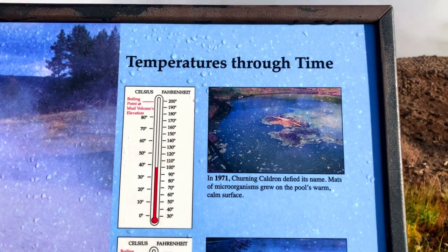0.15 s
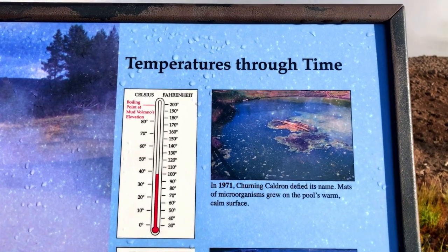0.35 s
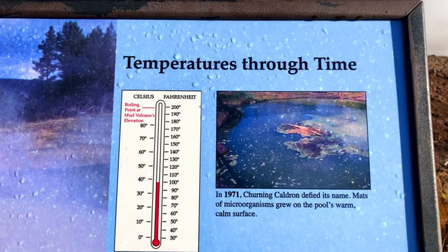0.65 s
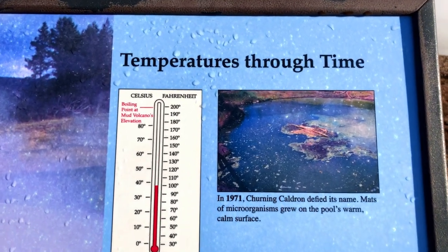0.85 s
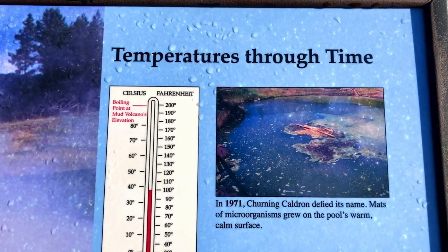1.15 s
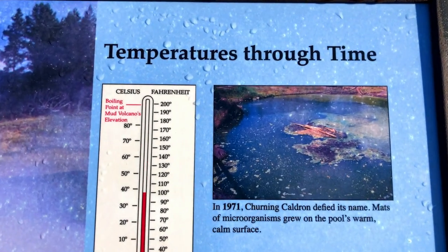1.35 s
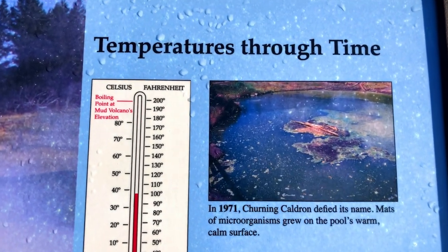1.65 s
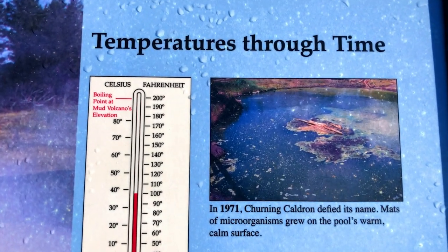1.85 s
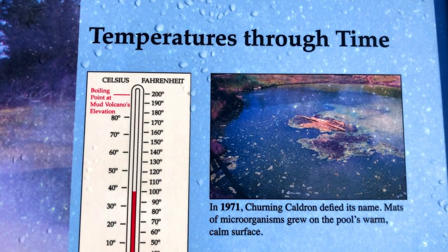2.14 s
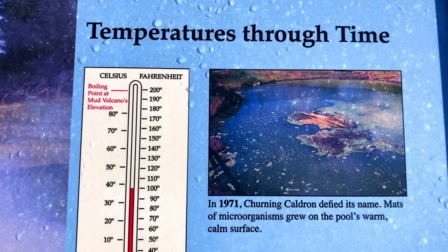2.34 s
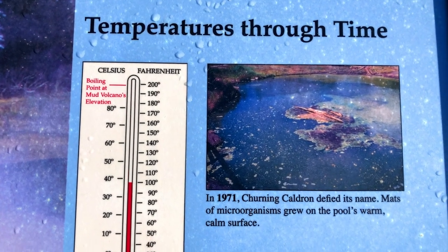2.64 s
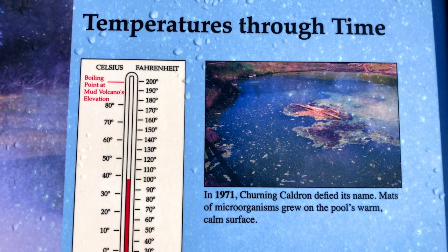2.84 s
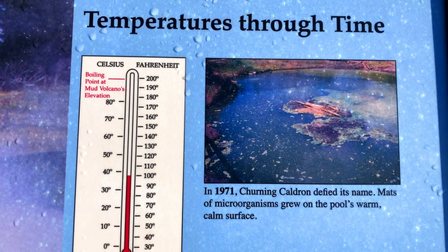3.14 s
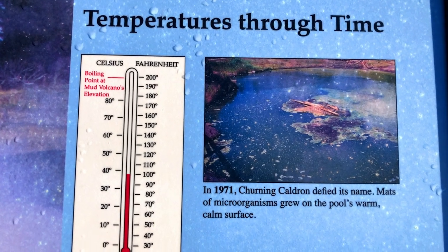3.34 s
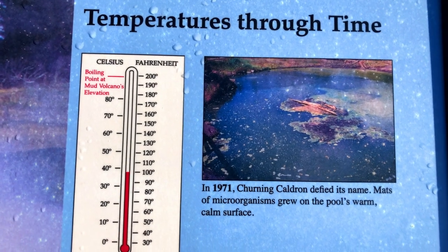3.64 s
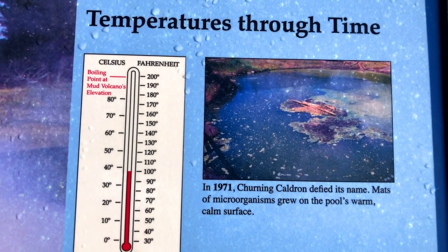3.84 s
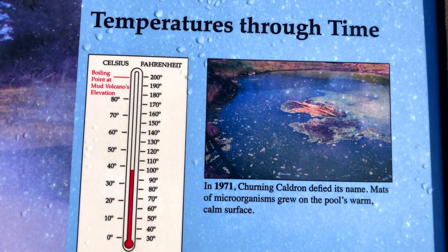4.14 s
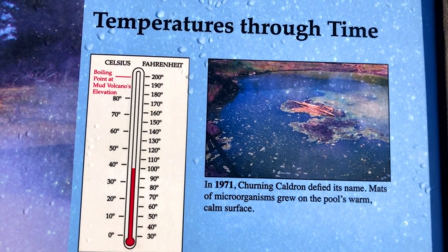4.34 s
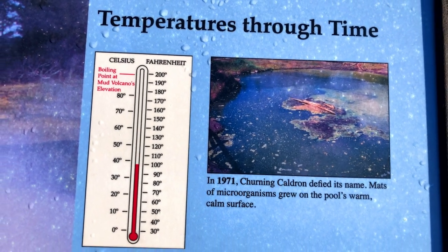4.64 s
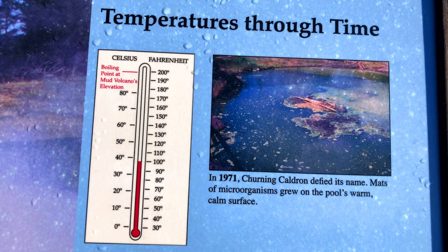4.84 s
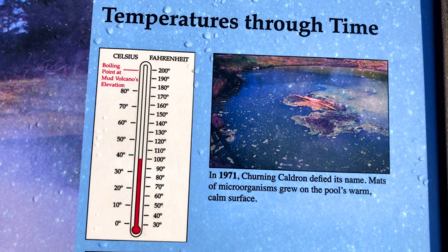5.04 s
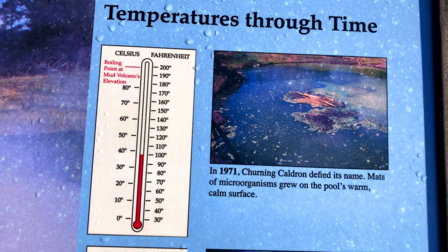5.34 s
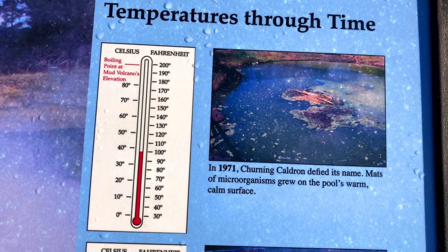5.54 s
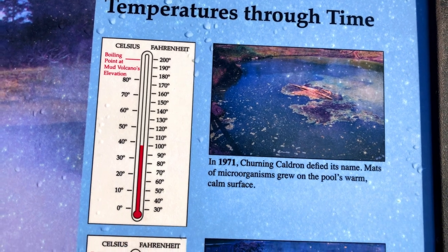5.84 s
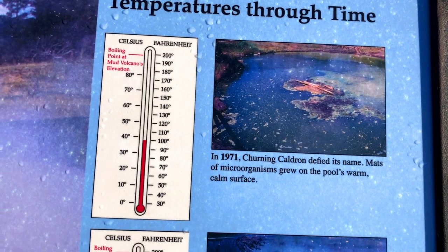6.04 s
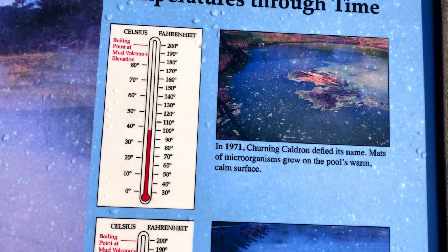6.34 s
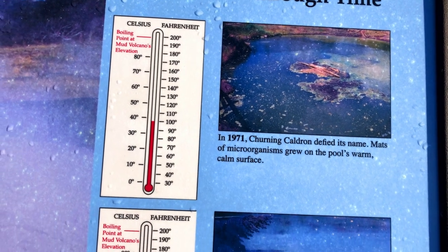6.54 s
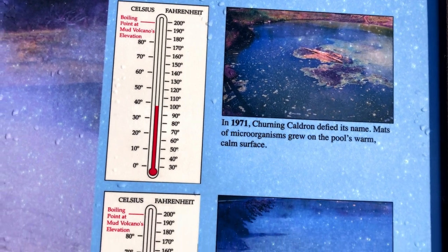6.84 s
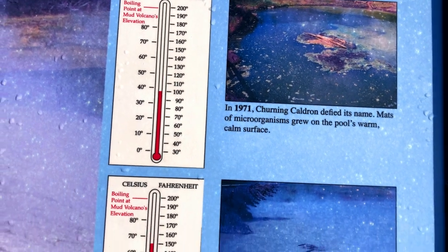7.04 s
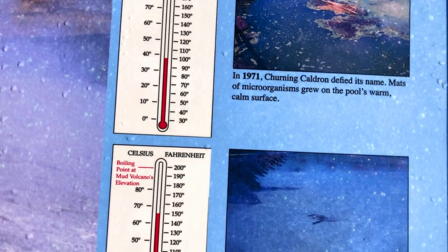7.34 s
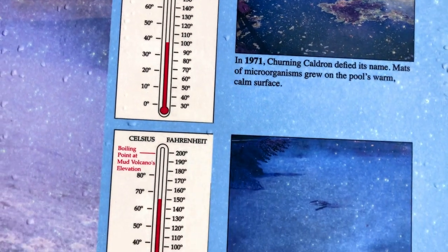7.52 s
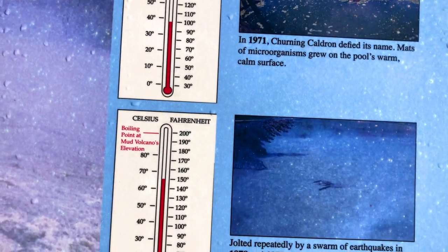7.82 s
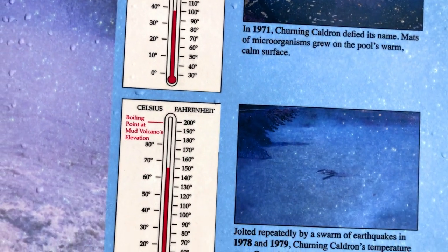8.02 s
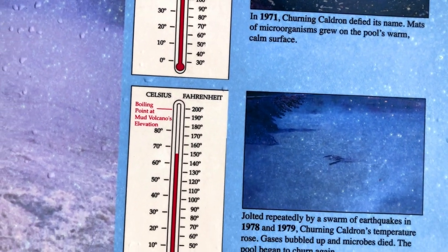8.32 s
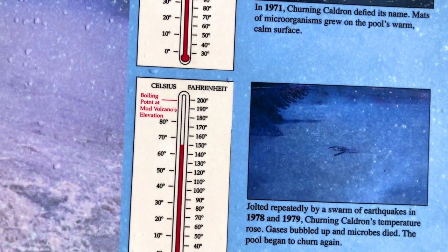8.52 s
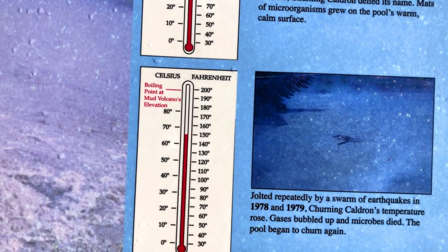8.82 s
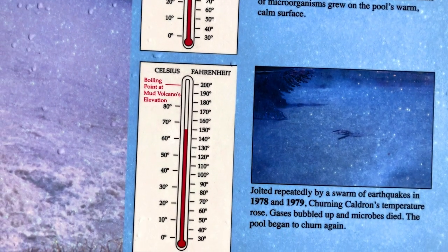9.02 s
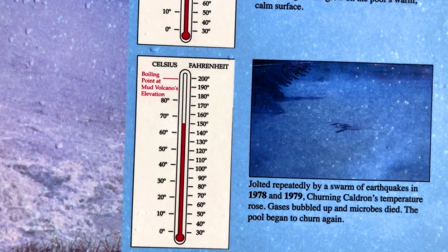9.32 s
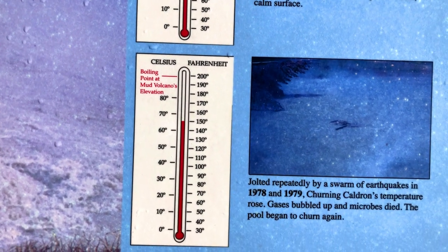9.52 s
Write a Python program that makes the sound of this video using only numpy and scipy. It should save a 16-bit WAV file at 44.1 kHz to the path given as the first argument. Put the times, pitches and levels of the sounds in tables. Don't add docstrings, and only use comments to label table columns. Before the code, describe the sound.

A steaming pool churns without pause, heard on a handheld phone in the open. First a muffled rumble and slosh, then fuller splashing from about two seconds, a lull near five and a half, then big bubbles bursting and a flurry of plops. Steam hisses thinly throughout and swells at the very end. A few short low wind puffs thud on the microphone around nine seconds.

```python
import sys
import numpy as np
from scipy import signal
from scipy.fft import rfft, irfft, next_fast_len
from scipy.io import wavfile
from scipy.ndimage import uniform_filter1d, map_coordinates

SR = 44100
rng = np.random.default_rng(int(sys.argv[2]) if len(sys.argv) > 2 else 0)


def natural_amplitude(level_db):
    exponent = np.asarray(level_db, float) / 20
    return 10 ** exponent


def materialize(psi):
    bounded = np.clip(np.atleast_2d(psi).T, -1, 1)
    quanta = np.round(bounded * 32767).astype(np.int16)
    wavfile.write(sys.argv[1], SR, quanta)


N = 426447


def unit(x):
    return x / np.sqrt(np.mean(x ** 2) + 1e-20)


def along(points, hz):
    f, v = np.transpose(points)
    return np.interp(np.log(hz + 1), np.log(f + 1), v)


def curves(rows):
    s, *cols = np.transpose(rows)
    return [np.interp(np.arange(N) / SR, s, c) for c in cols]


def wobble(rate_hz):
    return map_coordinates(rng.standard_normal(400), [np.arange(N) * min(rate_hz, 40) / SR])


def swells(times_s, lifts_db, width_s):
    t = np.arange(0, N, 64) / SR
    bells = np.exp(-((t - np.reshape(times_s, (-1, 1))) / width_s) ** 2)
    return np.interp(np.arange(N) / SR, t, np.dot(lifts_db, bells))


def filtered(x, response):
    m = next_fast_len(N + 8192)
    return irfft(rfft(x, m) * response(np.fft.rfftfreq(m, 1 / SR)), m)[..., :N]


def band(hz, lo_hz, hi_hz):
    return 1 / np.sqrt((1 + (lo_hz / (hz + 1)) ** 8) * (1 + (hz / hi_hz) ** 8))


def smoothed_noise(shape, bins, frames):
    field = uniform_filter1d(rng.standard_normal(shape), size=bins, axis=0)
    return unit(uniform_filter1d(field, size=frames, axis=1))


def patchy(depth_db, slow_db):
    z = signal.stft(rng.standard_normal((2, N)), nperseg=1024)[2]
    short = smoothed_noise(z.shape[1:], bins=16, frames=5)
    long = smoothed_noise(z.shape[1:], bins=2, frames=55)
    return unit(signal.istft(z * natural_amplitude(depth_db * short + slow_db * long), nperseg=1024)[1][:, :N])


def bubbles(count, centre_hz, spread, cycles, rise, scatter_db):
    size = 3000000 // count
    draw = rng.random((count, 4))
    hz = centre_hz * np.exp(spread * rng.standard_normal((count, 1)))
    u = np.arange(size) / SR * hz / cycles
    ring = np.sin(2 * np.pi * cycles * (u + rise * u ** 2 / 2)) * u * np.exp(-4 * u)
    ring *= natural_amplitude(np.minimum(-scatter_db * np.log(1 - draw[:, :1]), 8.5))
    where = (draw[:, 1:2] * 2 * N).astype(int) + np.arange(size)
    return unit(np.bincount(where.ravel(), ring.ravel(), 2 * N + size)[:2 * N].reshape(2, N))


def sweeps(rows, skew=1.0):
    out = np.zeros(N + SR)
    for s, start_hz, end_hz, length_s, db in rows:
        u = np.arange(round(length_s * SR)) / (length_s * SR)
        turns = length_s * (start_hz * u + (end_hz - start_hz) * u ** 2 / 2)
        out[round(s * SR):][:len(u)] += natural_amplitude(db) * np.sin(np.pi * u ** skew) * np.sin(2 * np.pi * turns)
    return out[:N]


# (time [s], start [Hz], end [Hz], length [s], peak [dB])
PUFFS = [
    (9.0, 50, 54, 0.093, -22),
    (9.05, 116, 50, 0.13, -33),
    (9.222, 171, 12, 0.037, -14),
    (9.276, 190, 260, 0.021, -20),
    (9.297, 233, 250, 0.025, -18),
    (9.343, 276, 240, 0.015, -17),
]


def wind():
    rumble = unit(filtered(patchy(2.2, 0.92), lambda hz: band(hz, 35, 190)))
    return sweeps(PUFFS) * natural_amplitude([[-1.2], [1.2]]) + natural_amplitude(-47 + 1.4 * wobble(3.43)) * rumble


# (time [s], level [dB])
STEAM = [(0, -50.5), (.7, -50.5), (1.37, -53.5), (2.2, -45.5), (2.31, -49.5), (2.45, -56.5), (2.9, -49),
         (3.26, -52), (3.9, -55.5), (5.65, -54.5), (6.06, -50.5), (6.63, -53), (7.5, -50), (7.64, -55),
         (8.3, -54.5), (8.75, -52.5), (9.2, -50), (9.67, -37)]
# (frequency [Hz], density [dB per Hz])
HISS = [(1500, -13), (3000, -2), (5000, -4), (8000, -0.5), (11000, -1), (13000, -4.5), (14500, -5),
        (15800, -8.5)]


def steam():
    s, _, spray_db = np.transpose(BREAKERS)
    level_db = curves(STEAM)[0] + swells(s, spray_db, SPRAY_S)
    fizz = patchy(1, 1.4)
    fizz += 0.33 * bubbles(count=40000, centre_hz=7000, spread=0.51, cycles=2.1, rise=.12, scatter_db=0)
    puffs = natural_amplitude(0.16 * wobble(14) + 0.69 * wobble(22))
    hiss = filtered(fizz, lambda hz: natural_amplitude(along(HISS, hz)))
    return natural_amplitude(level_db + 4.0) * unit(puffs * hiss)


# (time [s], peak [dB], pitch [Hz])
DROPS = [(1.12, -22, 660), (2.064, -25, 644), (2.431, -23, 611), (2.552, -17.5, 594), (2.601, -20.5, 660),
         (2.64, -22, 660), (2.853, -23, 660), (2.901, -20, 624), (3.233, -28, 515), (4.092, -26, 550),
         (4.354, -25, 750), (5.473, -26, 546), (5.52, -26, 674), (5.661, -28, 650), (5.812, -26, 625),
         (5.97, -19, 620), (6.034, -19, 665), (6.064, -16, 654), (6.229, -22, 595), (6.329, -19, 622),
         (6.475, -16, 643), (6.795, -31, 650), (6.827, -21, 676), (6.889, -21, 580), (6.967, -21, 680),
         (7.056, -18, 694), (7.145, -18, 660), (7.311, -25, 678), (7.345, -18, 670), (7.476, -19, 655),
         (7.515, -18, 704), (7.583, -29, 636), (7.858, -19, 596), (8.067, -23, 705), (8.245, -26, 665),
         (8.4, -20, 700), (8.664, -22, 615), (9.019, -22, 526), (9.607, -22, 614), (9.652, -17, 620)]
DROP_DB, DROP_CYCLES, DROP_RISE = -4, 9.8, 1.08


def drops():
    tones = [(s, hz, DROP_RISE * hz, DROP_CYCLES / hz, db + DROP_DB) for s, db, hz in DROPS]
    return sweeps(tones, skew=0.27) * [[1], [.4]]


# (time [s], start [Hz], end [Hz], length [s], peak [dB])
BURSTS = [(1.33, 70, 50, 0.038, -27), (1.41, 45, 85, 0.055, -24), (1.497, 75, 113, 0.042, -20),
          (1.585, 166, 191, 0.023, -23.5), (1.665, 90, 115, 0.05, -26), (2.299, 1650, 2530, 0.0063, -21.5),
          (2.545, 224, 175, 0.052, -19.5), (2.61, 60, 80, 0.058, -23), (2.67, 90, 120, 0.02, -23),
          (5.59, 55, 72, 0.043, -16), (5.618, 74.6, 112, 0.057, -16), (5.67, 124.6, 143, 0.036, -17),
          (5.705, 75, 90, .035, -22), (5.77, 110, 135, 0.034, -19.5), (5.81, 170, 205, 0.024, -20),
          (5.845, 149, 185, 0.04, -17), (6.03, 108, 150, 0.034, -16), (6.298, 100, 140, 0.028, -14),
          (6.326, 110, 170, 0.015, -9.5), (6.347, 99, 125, 0.025, -11.5), (6.44, 177, 197, 0.03, -18),
          (6.47, 170, 210, 0.021, -18), (9.6, 150, 128, 0.039, -20.5), (9.638, 150, 180, 0.014, -18)]


def gas_bursts():
    return sweeps(BURSTS) * natural_amplitude(2 + 1.5 * wobble(38)) * [[1], [0]]


# (time [s], vigour [dB])
VIGOUR = [(0, -31.5), (.45, -26), (.6, -31.5), (1.36, -30.5), (1.45, -26.5), (2.18, -23.5), (2.52, -30.5),
          (2.58, -22.5), (3.2, -22), (4.12, -27.5), (4.5, -29), (5.42, -26.5), (5.53, -33.5), (5.6, -27),
          (6.33, -19), (7.45, -21), (7.65, -27.5), (9.67, -27)]
# (time [s], openness of pool [0-1], openness of splashing edge [0-1])
OPENING = [(0, 0.15, 0.079), (1.9, 0.31, 0.23), (2.25, 0, 0.8), (2.4, 0.1, 0.44), (5.6, 0.32, 0.65),
           (7.5, 0.88, 0.37), (8.0, 1, 0.13), (8.6, 0.89, .1), (8.7, 0.88, 0.57), (9.15, 0.36, 0.57),
           (9.4, 0.16, 0.13), (9.67, 0.19, 1)]
# (time [s], lift of heave [dB], lift of roar [dB])
HEAVES = [(.05, 5, 4), (.16, 4, 0.5), (.55, 3, -1.5), (1.4, 1.5, -1.5), (1.53, 5, -1.5), (1.67, -5, -3),
          (1.88, -10, -4.5), (2.04, -2, -1.5), (2.16, -1, -3.5), (2.64, 4, 0), (3.16, 2, 0),
          (3.6, 7.5, -1.5), (3.84, 6, 0.5), (4.07, 5, 2.5), (4.5, 4.5, 1), (4.79, -7, 0), (4.93, 10, -0.5),
          (5.08, 9, 3), (5.25, 3, 1), (5.39, 4, 3.5), (5.64, -3, 4), (6.33, 7, 0), (6.59, -1, -4.5),
          (6.74, 7, -1.5), (8.05, -6, 4), (8.16, 9, -3), (8.38, 5, 2.5), (8.621, 12, -1.5), (9.24, 4, -2.5),
          (9.62, 7, 0.5), (.76, -4, -2), (.9, -4, 1), (1.03, -4, -1.5), (1.22, -1, -1.5), (2.33, -7, -3),
          (2.97, -2, -1.5), (3.33, -4, -2.5), (3.75, -8, 2), (4.25, 1, 1), (4.4, 1, 0.5), (4.65, 6, 2.5),
          (5.149, -2, 1), (5.78, 5.5, -0.5), (5.93, 6.5, -0.5), (6.12, 4, 1), (6.9, 1, 0), (7.05, -2, -2.5),
          (7.26, 2, -2), (7.4, 2, 0), (7.56, -6, -1), (7.72, -2, -2.5), (7.88, -2, 2.5), (8.27, 5, 2.5),
          (8.5, -4, -1), (8.8, -3, 0), (8.92, 3, 0), (9.14, 0, -0.5), (9.46, 7.5, -2), (6.24, -1, 0.5),
          (1.97, 4, 1)]
# (time [s], lift of water [dB], lift of spray [dB])
BREAKERS = [(.38, 0, 0.5), (0.909, 4.5, 3.5), (.99, 3, 8.5), (1.21, 3, 1), (1.35, -0.5, 1.5), (1.59, 0, 0),
            (2.07, 0.5, 0), (2.27, 6, -1), (2.64, 1.5, 0.5), (3.1, 4, 5.5), (3.15, 1.5, 5), (3.62, 2, 2.5),
            (3.86, 3.5, 4.5), (4.33, 1, 4), (5.01, -2, 4), (5.22, 0, 3), (5.82, 4, 0), (6.33, 4.5, -0.5),
            (6.42, 4, 1), (6.5, 2.5, 0), (6.8, 2, 2.5), (6.98, -2.5, 1.5), (7.54, 5, -2.5), (8.2, -1.5, 1),
            (8.36, 3.5, 0.5), (8.55, -4, -2), (8.73, 3, 1), (8.83, 3.5, 4.5), (8.93, 3, -2.5), (9.35, 5, 0)]
# (time [s], lift of splashing [dB])
SPLASHES = [(.13, -0.5), (.8, 1.5), (1.3, 1.5), (1.75, 0), (2.15, 0), (2.28, 0.5), (2.42, -0.5), (2.8, -1),
            (3.45, -2.5), (3.75, -1.5), (4.1, 0.5), (4.85, -0.5), (5.0, 0), (5.4, 0.5), (5.6, -1),
            (5.9, -2), (6.2, -2), (6.38, 0), (6.47, -0.5), (6.65, -2), (6.95, 1), (7.2, -3), (7.8, 1),
            (8.05, 2), (8.45, -0.5), (8.68, 0), (8.78, 1), (9.0, 1), (9.25, -2), (9.45, -2)]
HEAVE_S, BOIL_S, BREAK_S, SPRAY_S, SHEET_S = 0.074, 0.097, 0.042, 0.029, 0.095
CALM_DB, STILL_DB = -26.5, -50.5
HEAVE_DB, SLOSH_DB, SPLASH_DB = -36, -34, -38.5
HEAVE_GROWS, SLOSH_GROWS, SPLASH_GROWS = 0.74, 0.51, 0.3
SPLASH_SPRAYS = 0.39
SLOSH_OPENS_DB, SPLASH_OPENS_DB, HEAVE_OPENS_DB = 2.5, 2.5, 0
SETTLE_S = 0.46
YIELD_DB, YIELD_S = -1, 0.026
HUSH_DB, HUSH_S = -7, .004


def churn():
    (vigour_db,), (steam_db,), (openness, edge) = curves(VIGOUR), curves(STEAM), curves(OPENING)
    swing_db, spray_db = vigour_db - CALM_DB, steam_db - STILL_DB
    sway_db = uniform_filter1d(swing_db, size=round(SETTLE_S * SR))

    s, water_db, mist_db = np.transpose(BREAKERS)
    wave_db, mist_db = swells(s, water_db, BREAK_S), swells(s, mist_db, SPRAY_S)
    hush_db = swells(np.transpose(DROPS)[0] - HUSH_S, np.full(len(DROPS), HUSH_DB), HUSH_S)
    s, _, _, length_s, _ = np.transpose(BURSTS)
    yield_db = swells(s + length_s / 2, np.full(len(s), YIELD_DB), YIELD_S)
    s, gas_db, boil_db = np.transpose(HEAVES)

    heave_db = HEAVE_DB + HEAVE_GROWS * swing_db + HEAVE_OPENS_DB * openness
    heave_db = heave_db + yield_db + swells(s, gas_db, HEAVE_S) + 1.0 * wobble(6.0)
    roar_db = vigour_db + yield_db + swells(s, boil_db, BOIL_S) + 0.23 * wobble(6.4)
    slosh_db = SLOSH_DB + SLOSH_GROWS * sway_db + SLOSH_OPENS_DB * openness
    slosh_db = slosh_db + wave_db + hush_db + 1.6 * wobble(7)
    splash_db = SPLASH_DB + SPLASH_GROWS * sway_db + SPLASH_SPRAYS * spray_db + SPLASH_OPENS_DB * edge
    splash_db = splash_db + 0.23 * wave_db + 0.3 * mist_db + swells(*np.transpose(SPLASHES), SHEET_S)
    return heave_db, roar_db, slosh_db, splash_db


# (frequency [Hz], density [dB per Hz])
WATER = [(13, -44), (22, -20), (55, -9), (186, -0.5), (318, -3.5), (490, -11), (653, -4), (854, -11),
         (1200, -33), (1600, -41), (2080, -57), (3520, -120)]
# (frequency [Hz], density [dB per Hz])
SPRAY = [(600, -3), (1000, -2), (1500, -6), (2200, -11), (3200, -14.5), (5000, -21), (8000, -35),
         (16000, -54)]


def water_band(x, lo_hz, hi_hz):
    return unit(filtered(x, lambda hz: natural_amplitude(along(WATER, hz)) * band(hz, lo_hz, hi_hz)))


def splash_band(x):
    return unit(filtered(x, lambda hz: natural_amplitude(along(SPRAY, hz)) * band(hz, 820, 16000)))


def pool():
    heave_db, roar_db, slosh_db, splash_db = churn()
    heave = water_band(patchy(0.33, 0.76), 37, 92.7) * natural_amplitude(0.41 * wobble(15))

    roar = water_band(patchy(0.71, 0.65), 100.0, 455)
    crowd = bubbles(count=1600, centre_hz=184.7, spread=0.451, cycles=7.75, rise=0.497, scatter_db=0.0)
    roar += .5 * water_band(crowd, 63, 770)

    slosh = water_band(patchy(0.96, 1.0), 337, 1250)
    crowd = bubbles(count=4000, centre_hz=630, spread=0.196, cycles=11.5, rise=0.31, scatter_db=2.0)
    slosh += 0.39 * water_band(crowd, 510, 1040)

    splash = splash_band(patchy(1.6, 1.7))
    crowd = bubbles(count=16000, centre_hz=1780, spread=0.489, cycles=23.8, rise=0.48, scatter_db=10.0)
    splash += 0.36 * splash_band(crowd)
    return (natural_amplitude(heave_db) * unit(heave) + natural_amplitude(roar_db + 1.5) * unit(roar)
            + natural_amplitude(slosh_db) * unit(slosh) + natural_amplitude(splash_db + 0.3 * wobble(8.9)) * unit(splash))


# (time [s], peak [Hz], peak [dB], repeat step [Hz], low dip [Hz])
BOARD = [(0, 860, 4, 756, 740), (1.3, 915, 5, 560, 750), (1.9, 900, -1.5, 620, 770),
         (2.0, 1370, 1, 540, 900), (2.3, 1390, 2.5, 540, 915), (2.6, 1410, 6.5, 520, 890),
         (3, 1470, 4.5, 500, 980), (3.7, 1460, 5.5, 400, 920), (4.4, 1430, 3, 400, 890),
         (5.3, 1600, 3.5, 560, 930), (6.2, 1420, 2.5, 560, 935), (6.9, 1440, -6, 600, 920),
         (7.1, 1210, 3.5, 600, 871), (7.7, 1160, 4.5, 1150, 844), (8.55, 1180, 7, 1150, 830),
         (8.9, 1120, 1.5, 700, 940), (9.15, 1150, 6, 600, 640), (9.67, 1220, 3, 600, 644)]
# (time [s], first [Hz], first [dB], second [Hz], second [dB])
NOTCHES = [(0, 780, -12, 1320, -5), (.7, 755, -3, 1310, -4), (1.3, 740, -11, 1328, -8),
           (1.9, 750, -8, 1240, -8), (2.3, 820, -10, 1300, -17), (3, 860, -8, 1250, -1),
           (4, 850, -9, 1280, -5), (5, 860, -7, 1240, 0), (6, 870, -6, 1290, -5), (6.5, 840, -4.5, 1540, 2),
           (6.8, 880, -8, 1680, -11), (7.2, 850, -6, 1960, -8), (8, 870, -10, 2080, -7),
           (8.6, 870, -3, 2100, -8), (9, 940, 0, 2140, 4), (9.3, 970, 2, 2050, -2),
           (9.67, 1010, -4, 2050, 3)]
# (time [s], frequency [Hz],
# lift [dB])
GURGLES = [(0.14, 460, 2.5), (0.37, 1020, 7.5), (0.84, 1900, 4), (1.06, 1200, 5), (1.32, 1900, 10),
           (1.76, 1900, 8.5), (7.9, 170, -2), (2.2, 1940, 6), (2.22, 2400, 9), (3.4, 2100, 6),
           (3.75, 2300, 8), (5, 1300, 4), (2.48, 420, -3.5), (6.4, 1000, 3.5), (6.83, 260, -4),
           (6.2, 260, -2.5), (8.1, 970, 7), (8.6, 520, 4), (8.6, 1620, 4), (8.75, 1080, 5), (9.6, 560, 2),
           (9.55, 550, 5), (5.12, 162, -5.5), (3.57, 340, 2.5), (8.29, 160, -1), (2.2, 340, 5),
           (3.17, 460, 1), (3.9, 170, -2.5), (6.1, 1300, 2), (6.43, 2100, 4), (6.42, 2700, 0),
           (2.3, 2800, 9), (1.6, 420, -0.5)]
COMB_FADE_HZ, PEAK_SHARPNESS, TROUGH_SHARE = 1300, 0.71, 0.1
LOW_DIP_DB, DIP_FILLS_DB, DIP_HZ = -4.5, 6.5, 110
SHADE_HZ, SHADE_DB = 383, -3.5
NOTCH_HZ, GURGLE_S, GURGLE_HZ = 55, 0.14, 90


def board(x):
    hz, t, z = signal.stft(x, SR, nperseg=1024)

    def bell(centre_hz, width_hz):
        return np.exp(-((hz[:, None] - centre_hz) / width_hz) ** 2)

    s, *cols = np.transpose(BOARD)
    peak_hz, peak_db, step_hz, low_hz = [np.interp(t, s, c) for c in cols]
    above_hz = hz[:, None] - peak_hz
    fade = np.where(above_hz > 0, np.exp(-above_hz / COMB_FADE_HZ), np.exp(-(above_hz / 110) ** 2))
    comb = np.cos(2 * np.pi * above_hz / step_hz)
    comb = np.where(comb > 0, abs(comb) ** PEAK_SHARPNESS, TROUGH_SHARE * comb)
    gain_db = peak_db * fade * comb

    openness = np.interp(t, *np.transpose(OPENING)[:2])
    gain_db += (LOW_DIP_DB + DIP_FILLS_DB * openness) * bell(low_hz, DIP_HZ)
    gain_db += SHADE_DB * (1 - openness) * bell(SHADE_HZ, 130)

    s, *cols = np.transpose(NOTCHES)
    first_hz, first_db, second_hz, second_db = [np.interp(t, s, c) for c in cols]
    gain_db += first_db * bell(first_hz, NOTCH_HZ) + second_db * bell(second_hz, NOTCH_HZ)
    for s, at_hz, lift_db in GURGLES:
        gain_db += lift_db * bell(at_hz, GURGLE_HZ) * np.exp(-((t - s) / GURGLE_S) ** 2)
    return signal.istft(z * natural_amplitude(gain_db), SR, nperseg=1024)[1][:, :N]


SPREAD_HZ, SPREAD_TURN_HZ = 6930, 4410


def link(table, hz):
    f, alike, lead, pan_db = np.transpose(table)
    spread = -2 * np.pi * (hz - SPREAD_HZ) / SPREAD_TURN_HZ
    lead = np.where(hz > SPREAD_HZ, spread, np.interp(hz, f, lead))
    return np.array([np.interp(hz, f, alike) * np.exp(-1j * lead), np.interp(hz, f, pan_db)])[..., None]


# (frequency [Hz], likeness [0-1], left leads [rad], left-right [dB])
ASIDE = [(0, .99, 0, -1), (200, .99, .2, -2), (450, .93, .5, -.5), (750, .7, 1, 0), (1000, .68, 1.3, .5),
         (1450, .3, 2.3, 1), (2200, .6, 3.4, 1.5), (3200, .5, 3.4, 1.3), (3800, .2, 4.2, 1),
         (4800, .2, 5.2, .8), (5200, .4, 8.4, .3), (5900, .5, 7.9, 0), (6500, .6, 6.9, 0),
         (6900, .93, 2 * np.pi, 0), (7600, 1, 0, 0)]
# (frequency [Hz], likeness [0-1], left leads [rad], left-right [dB])
BEHIND = [(0, .99, 0, -1), (200, .99, .2, -2), (450, .92, .4, -.5), (800, .7, 1.1, 0), (1050, .5, 0, .5),
          (1550, .2, -1.3, 1), (2000, .5, -1.9, 1.5), (2500, .25, -2.4, 1.4), (3100, .45, -3.3, 1.3),
          (3700, .25, -3, 1), (4700, .15, -1.5, .8), (5200, .3, 2, .3), (5900, .45, 1.9, 0),
          (6500, .55, .6, 0), (6900, .93, 0, 0), (7600, 1, 0, 0)]
# (frequency [Hz], likeness [0-1], left leads [rad], left-right [dB])
PASSING = [(0, .96, .1, -.5), (500, .88, .4, 0), (860, .55, .6, 0), (1100, .78, .3, 0), (1800, .7, .3, 0),
           (2330, .4, .8, 0), (2700, .5, 2.2, 0), (3620, .6, 2.7, 0), (4200, .7, 3.7, 0),
           (4800, .95, 3.2, 0), (5250, .93, 3, 0), (5700, .3, 4.4, 0), (6370, .7, 6.1, 0),
           (6900, .93, 2 * np.pi, 0), (7600, 1, 0, 0)]
# (frequency [Hz], likeness [0-1], left leads [rad], left-right [dB])
AHEAD = [(0, .98, .1, -.5), (500, .88, .4, 0), (900, .6, .4, 0), (1100, .8, .5, 0), (1900, .7, .6, 0),
         (2400, .45, 2.2, 0), (2800, .8, 2.4, 0), (3400, .93, 3, 0), (3700, .945, 3.2, 0),
         (4300, .55, 4.2, 0), (5000, .55, 3.6, 0), (5600, .2, 4.6, 0), (6200, .85, 6.3, 0),
         (6900, .97, 2 * np.pi, 0), (7600, 1, 0, 0)]
# (time [s], behind [0-1], passing [0-1], ahead [0-1])
TURN = [(0, 0, 0, 0), (3, 0, 0, 0), (4.2, .5, 0, 0), (5.6, 1, 0, 0), (8.5, 1, 0, 0), (9.05, .4, .3, .3),
        (9.185, .2, .55, .25), (9.21, 0, 1, 0), (9.225, 0, 1, 0), (9.25, .15, .7, .15), (9.31, .1, .4, .5),
        (9.375, 0, .9, .1), (9.42, 0, 0, 1), (9.52, 0, 0, 1), (9.545, 0, .25, .75), (9.57, 0, 0, 1),
        (9.67, 0, .15, .85)]


def ports(pair):
    hz, t, (shared, own) = signal.stft(pair, SR, nperseg=1024)
    s, *shares = np.transpose(TURN)
    behind, passing, ahead = [np.clip(np.interp(t, s, c), 0, 1) for c in shares]
    aside = 1 - behind - passing - ahead
    alike, pan_db = (aside * link(ASIDE, hz) + passing * link(PASSING, hz)
                     + behind * link(BEHIND, hz) + ahead * link(AHEAD, hz))
    right = alike * shared + np.sqrt(np.clip(1 - abs(alike) ** 2, 0, 1)) * own
    tilt = natural_amplitude(pan_db.real / 2)
    return signal.istft(np.array([shared * tilt, right / tilt]), SR, nperseg=1024)[1][:, :N]


def scene():
    return ports(board(pool()) + gas_bursts() + drops() + steam()) + wind()


def band_limit(x):
    return signal.sosfilt(signal.butter(12, 17060, fs=SR, output="sos"), x)


TOP_HZ = 15780


def record(dry):
    mix = filtered(dry, lambda hz: hz < TOP_HZ)
    return band_limit(mix)


dry = scene()
out = record(dry)
materialize(out)
```